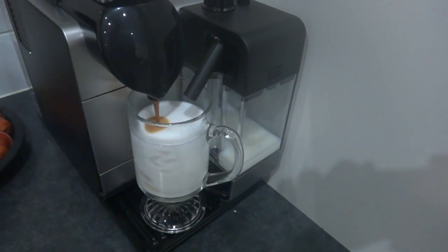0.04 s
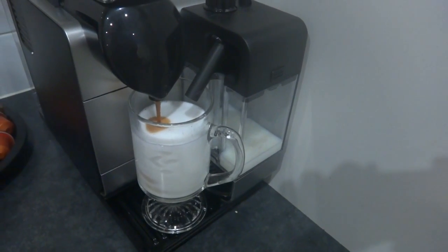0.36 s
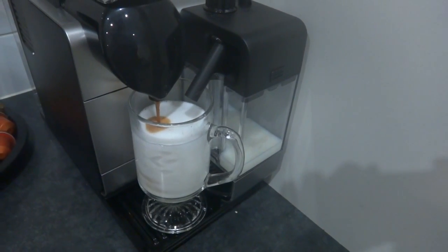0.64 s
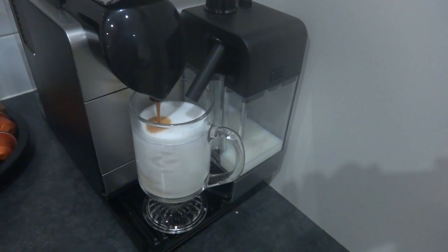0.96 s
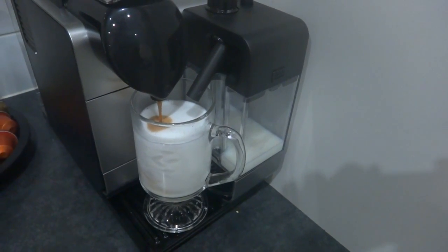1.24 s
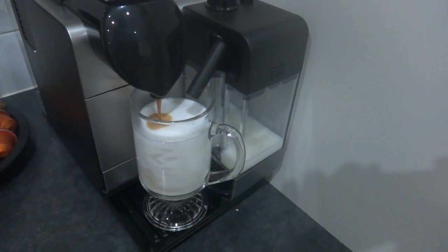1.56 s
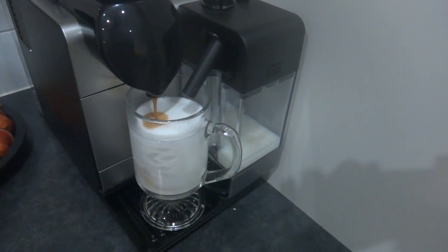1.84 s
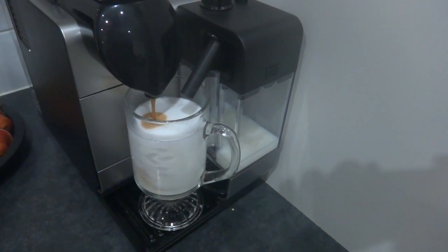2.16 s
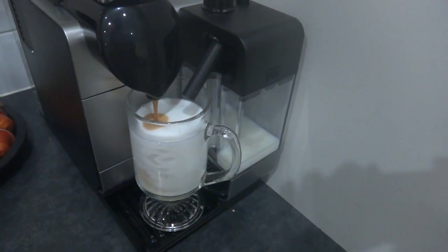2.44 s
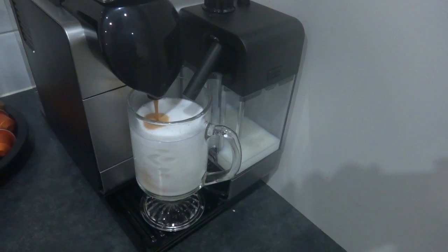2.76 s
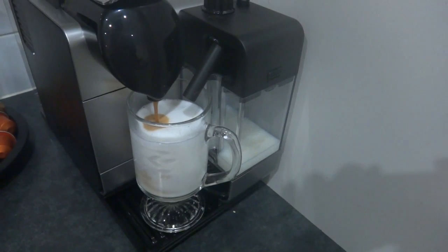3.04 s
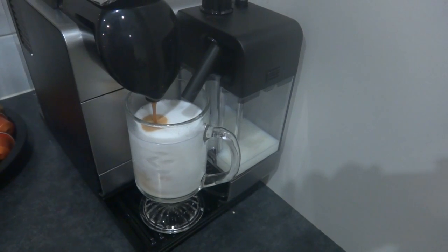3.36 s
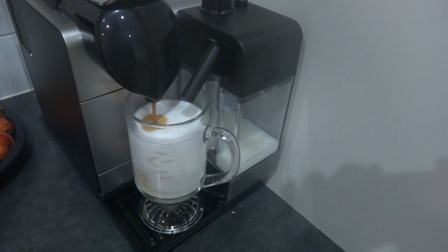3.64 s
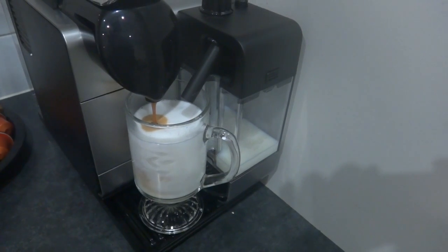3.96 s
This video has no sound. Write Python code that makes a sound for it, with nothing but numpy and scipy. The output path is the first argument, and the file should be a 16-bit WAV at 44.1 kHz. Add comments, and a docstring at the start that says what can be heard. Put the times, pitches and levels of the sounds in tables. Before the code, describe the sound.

A coffee machine pump buzzes close by in a kitchen. It opens with a loud, bright rattle and metallic ringing that die away by about 1 second. A quieter, steady drone with fine rapid ticking and occasional tiny clacks continues until 4 seconds. Water churns softly underneath. Around 2 seconds a panel briefly sings with the vibration, and a few faint gurgles pass between 2 and 2.5 seconds.

```python
"""Capsule coffee machine pouring

Close by in a kitchen, the machine pours into a mug of milk foam. Its vibrating pump strokes once per
mains cycle. At first the piston runs loose and rattles the housing; as water pressure builds, the
rattle dies and leaves a drone with the small knocks of piston and valves. Water churns underneath."""
import sys
import numpy as np
from scipy import signal
from scipy.fft import rfft, irfft
from scipy.io import wavfile
from scipy.ndimage import uniform_filter1d

SR = 44100
rng = np.random.default_rng(int(sys.argv[2]) if len(sys.argv) > 2 else 0)


def wrap_up_sound(samples):
    """Save the sound to the file named by the first command line argument, as 16-bit audio."""
    columns = np.atleast_2d(samples).T
    # keep every value between -1 and 1, then stretch to whole-number steps
    tamed = np.clip(columns, -1, 1)
    steps = np.round(tamed * 32767).astype(np.int16)
    wavfile.write(sys.argv[1], SR, steps)


N = 176400
STROKE_HZ = 50.05

# water pressure building up (time [s], share of full pressure [0-1])
PRESSURE_RISE = [(0, 0.02), (.25, 0.11), (.6, 0.28), (1.0, 0.45), (1.6, 0.59), (2.2, 0.76), (2.8, 0.91),
                 (3.4, 0.92), (4, 0.9)]
# sharp resonances of the housing (pitch [Hz], width [Hz])
HOUSING_MODES = [(2300, 140), (2531, 210), (3220, 29), (4230, 54), (5400, 28), (6020, 82), (11240, 290)]

# tone of the churning water (frequency [Hz], relative level [dB])
WATER_COLOUR = [(25, -42), (60, -40), (85, -11.5), (140, -23), (260, -8.5), (370, -9.5), (480, 2.5),
                (560, -4), (1200, 0.5), (1650, -3), (2000, -18), (2800, -7.5), (4000, -50)]
# envelope of the churning (time [s], relative level [dB])
WATER_ENVELOPE = [(0, -28.5), (.3, -35), (1.3, -38.5), (1.9, -39), (2.2, -40.5), (2.33, -38), (2.7, -43),
                  (4, -42.5)]
# short gurgles (time [s], half length [s], level [dB])
GURGLE_CUES = [(2.08, 0.048, -41), (2.324, .05, -36), (2.498, 0.015, -36), (2.53, .015, -33.5)]
# tone of the gurgling pipe (frequency [Hz], relative level [dB])
PIPE_COLOUR = [(1000, -10), (1450, -1), (1800, -10), (3200, -10), (6000, -45)]

# partials of a singing panel (multiple of the stroke rate, level [dB])
PANEL_PARTIALS = [(17, -39.5), (45, -42)]
# clean buzz near full pressure (multiple of the stroke rate, level [dB])
BUZZ_PARTIALS = [(19, -48), (21, -50), (23, -51), (27, -55), (29, -45), (30, -50), (33, -48), (34, -44.5),
                 (35, -42.5), (44, -48), (50, -46)]
# metal parts rung by the rattle
# (loudest at [s], half length [s], delay in the stroke [s], pitch [Hz], decay [s], level [dB])
METAL_MODES = [(0.069, .13, .0095, 2000, 0.008, -28.5), (.21, 0.13, .0095, 2160, 0.0064, -28),
               (0.69, 0.22, .0105, 1860, 0.0074, -34), (0.39, 0.52, .011, 3250, 0.0031, -39.5),
               (0.22, 0.55, 0.00894, 6050, 0.0035, -36.5)]
# valves and spring (delay in the stroke [s], pitch [Hz], decay [s], level [dB], timing jitter [s])
VALVE_MODES = [(.0078, 2282, 0.0022, -43.5, 0.000077), (.0112, 2530, 0.0026, -44, .00004),
               (.0135, 3230, 0.0036, -46.5, .00009), (.0105, 4230, 0.0026, -50.5, 0.000059),
               (.0105, 6000, 0.0038, -52, .00005), (.0005, 7200, .0022, -54.5, 0.000036),
               (.0005, 8220, 0.0039, -55, .00004), (0.0016, 8770, 0.0028, -55, .00004),
               (.0095, 11250, 0.0015, -57, 0.000046)]
# single sharp clacks of the piston (time [s], relative level [dB])
CLACK_CUES = [(.9874, -40), (1.008, -43), (1.1474, -43), (1.228, -47), (1.647, -42), (1.7466, -43),
              (2.504, -43), (2.528, -49), (3.408, -43), (3.8664, -40.5)]

# contacts within each stroke, under load and running loose (delay [s], centre [Hz], spread [octaves],
# relative level [dB], decay [s], swing up and down on alternate strokes [dB])
KNOCK_HITS = [(0, 8360, 0.25, 4, .0025, 3.5), (.002, 5570, 1, -3, 0.0066, 1),
              (.0038, 1360, 0.7, -1.5, 0.0035, 1.5), (.0096, 8000, 0.81, -3.5, 0.0058, -0.8),
              (.0135, 2630, 0.62, 1, 0.0036, 1), (.0163, 1390, 0.31, -1, 0.0064, 0)]
RATTLE_HITS = [(.0024, 1220, 1.43, -5, 0.0043, -3), (.0064, 9900, 0.96, 0, 0.0027, 1),
               (.0084, 7000, 1.83, -1, 0.0041, -0.5), (.0098, 2070, 0.77, 4.5, 0.0067, 0.2)]
# tone of the housing under knocks and under rattle (frequency [Hz], relative level [dB])
KNOCK_TONE = [(590, -36), (1000, -10), (1500, 0.5), (1840, -2), (2000, -11), (2400, -8), (2720, -9.5),
              (3050, -2.5), (3760, -14.5), (4600, -12), (6000, -15), (7500, -13), (9550, -19.5),
              (11300, -20.5), (13800, -28.5), (15700, -33)]
RATTLE_TONE = [(410, -41), (700, -2.5), (757, -9.5), (944, -3), (1020, -8.5), (1630, -14.5), (1830, -6.5),
               (2350, -9.5), (2740, -21), (3120, -10), (3840, -16.5), (6060, -15.5), (8170, -16.5),
               (10500, -16.5), (11300, -7.5), (12200, -18), (13200, -15.5), (13800, -42), (15700, -52)]
# envelopes of the knocks and the rattle (time [s], level [dB])
KNOCK_ENVELOPE = [(0, -28.5), (1, -33.5), (1.35, -35.5), (2.05, -36), (2.7, -36), (4, -35)]
RATTLE_ENVELOPE = [(0, -18), (.15, -21), (.32, -21.5), (.48, -24), (.65, -26.5), (.85, -30), (1.05, -41.5),
                   (1.4, -55), (4, -59)]
# top sizzle against the rest of the rattle (time [s], gain [dB])
SIZZLE_ENVELOPE = [(0, -1), (.3, 1.5), (.55, 1), (.75, -2), (1, -8)]

# pump drone at no, half and full pressure, stroke harmonics 1 to 20 (relative level [dB])
HARMONICS_FREE = [-41, -23.5, -12, -30, -7, -12, -7.5, -10.5, -7.5, -7.5, -31, -11.5, 0, -20, -6, -7, -3,
                  -3, -11.5, -4.5]
HARMONICS_HALF = [-47, -24.5, -22.5, -11, -6.5, -4.5, -4.5, -15.5, -3, -15, -43, -15.5, .5, 0.5, -27.5, -18,
                  -7, -12.5, -19, -15.5]
HARMONICS_FULL = [-40, -22.5, -16.5, -5.5, -7, 2.5, -6, -6, -1, -13.5, -47, -21, -1, -10, -8.5, -19, -20.5,
                  -41, -6.5, -20]
# envelope of the drone (time [s], relative level [dB])
DRONE_ENVELOPE = [(0.05, -21.5), (0.53, -23), (1.08, -27.5), (3.12, -30), (3.9, -30.5)]

TIME = np.arange(N) / SR
FREQS = np.arange(N // 2 + 1) * SR / N
STROKE_TIMES = np.arange(int(N / SR * STROKE_HZ) + 1) / STROKE_HZ


def undb(db):
    """Decibels to gain."""
    return 10 ** (np.asarray(db) / 20)


def unit(x):
    """Scale to rms 1."""
    return x / np.sqrt(np.mean(x ** 2))


def curve(rows):
    """Join (time [s], value) breakpoints with straight lines."""
    return np.interp(TIME, *np.array(rows).T)


def swell(at, half_length):
    """A rounded rise and fall around a moment."""
    return np.exp(-((TIME - at) / half_length) ** 2)


def wobble(rate_hz):
    """Smooth random modulation with a spread near 1."""
    hold = int(SR / rate_hz)
    steps = np.repeat(rng.standard_normal(N // hold + 1), hold)
    return 1.3 * uniform_filter1d(uniform_filter1d(steps, hold), hold)[:N]


def colour(x, points, smooth_bins=600):
    """Flatten the broad spectrum of x, then EQ it to the (frequency [Hz], level [dB]) points; rms 1."""
    hz, db = np.array(points).T
    spectrum = rfft(x)
    power = uniform_filter1d(abs(spectrum) ** 2, smooth_bins)
    gain = undb(np.interp(np.log(FREQS + 1), np.log(hz), db)) / np.sqrt(power + power.max() * 1e-7)
    low_cut = np.minimum(FREQS / hz[0], 1) ** 4 + 1e-4
    # minimum phase, so nothing rings ahead of a hit
    cepstrum = irfft(np.log(gain * low_cut))
    cepstrum[1:N // 2] *= 2
    cepstrum[N // 2 + 1:] = 0
    return unit(irfft(spectrum * np.exp(rfft(cepstrum))))


def struck(delay, hz, decay, jitter_s, rise_s=.00044, scatter_db=2.5):
    """One mode struck once a stroke, each blow a little different in time and strength; rms 1."""
    timing, strength = rng.standard_normal((len(STROKE_TIMES), 2)).T
    at = np.clip(STROKE_TIMES + delay + jitter_s * timing, 0, None) * SR
    hits = np.bincount(np.round(at).astype(int), undb(scatter_db * strength), 2 * N)[:N]
    t = TIME[:SR // 10]
    ring = (1 - np.exp(-t / rise_s)) * np.exp(-t / decay) * np.sin(2 * np.pi * hz * t)
    return unit(signal.fftconvolve(hits, ring)[:N])


def contacts(table, jitter_s, looseness, rise_s=.00048, scatter_db=1.68, swing_s=.00003):
    """Each contact hits once a stroke: a ring that is alike every time, plus ever-new bright chatter."""
    t = TIME[:SR // 20]
    alternate = np.cos(np.pi * np.arange(len(STROKE_TIMES)))  # +1, -1, +1, ...
    chatter_gain = looseness * FREQS / np.hypot(FREQS, 2200)  # high-pass
    out = 0
    for delay, hz, octaves, db, decay, swing_db in table:
        timing, strength = rng.standard_normal((len(STROKE_TIMES), 2)).T
        at = np.clip(STROKE_TIMES + delay + jitter_s * timing - swing_s * alternate, 0, None) * SR
        force = undb(scatter_db * strength + swing_db * alternate)
        whole, part = at.astype(int), at % 1  # each hit is shared between two samples
        hits = np.bincount(whole, force * (1 - part), 2 * N)[:N]
        hits += np.bincount(whole + 1, force * part, 2 * N)[:N]
        # a contact spreads through the housing before it is loudest
        envelope = (1 - np.exp(-t / rise_s)) * np.exp(-t / decay)
        ring = signal.fftconvolve(hits, envelope * rng.standard_normal(len(t)))[:N]
        chatter = signal.fftconvolve(hits, envelope)[:N] * rng.standard_normal(N)
        band = np.exp(-.5 * (np.log2((FREQS + 1) / hz) / octaves) ** 2)
        out += undb(db) * irfft(band * (rfft(ring) + chatter_gain * rfft(chatter)))
    return out


def housing(x, decay_s=.0053):
    """Plastic panels ring with a few strong resonances over many weak, short ones, mostly in the treble."""
    t = TIME[:SR // 20]
    strong = sum(1 / (1 + 2j * (FREQS - hz) / width) for hz, width in HOUSING_MODES)
    weak = rng.standard_normal(len(t)) * np.exp(-t / decay_s)
    rings = undb(18) * strong + undb(2) * rfft(weak / np.linalg.norm(weak), N)
    treble = FREQS ** 2 / (FREQS ** 2 + 6000 ** 2)
    return irfft(rfft(x) * (1 + treble * rings))


def kitchen(x, t60_s=.13, low_cut_hz=725, send_db=-11):
    """Short reflections from worktop and walls, different on each side and thin in the bass."""
    t = TIME[:SR // 3]
    tails = rng.standard_normal((2, len(t))) * np.exp(-np.log(1000) * t / t60_s)
    tails /= np.sqrt(np.sum(tails ** 2, axis=1, keepdims=True))
    tails = signal.sosfilt(signal.butter(1, low_cut_hz, "high", fs=SR, output="sos"), tails)
    return undb(send_db) * signal.fftconvolve(x[None], tails, axes=1)[:, :N]


def water(pulse_depth=.26, lag_s=.0072, trim_db=2):
    """Water churns in the pump and pipes, pushed by every stroke and swelling now and then."""
    push = 1 + pulse_depth * np.cos(2 * np.pi * STROKE_HZ * (TIME - lag_s))
    return colour(push * rng.standard_normal(N), WATER_COLOUR) * undb(curve(WATER_ENVELOPE) + trim_db)


def gurgles():
    """Pockets of air pass through the pipe in short, hollow swells of noise."""
    envelope = sum(undb(db) * swell(at, half) for at, half, db in GURGLE_CUES)
    return envelope * colour(rng.standard_normal(N), PIPE_COLOUR)


def panel(at_s=2, half_length_s=.22):
    """A loose panel swells into resonance and falls silent again."""
    envelope = np.exp(-((TIME - at_s) / half_length_s) ** 4)
    phase = 2 * np.pi * STROKE_HZ * TIME
    return envelope * sum(undb(db) * np.cos(k * (phase + .038 * wobble(24.94)))
                          for k, db in PANEL_PARTIALS)


def buzz(pressure, lag_s=.0172, waver_db=2.5, smear_rad=.63):
    """The loaded piston seats evenly, so a clean buzz grows with the pressure."""
    phase = 2 * np.pi * STROKE_HZ * (TIME - lag_s)
    out = 0
    for k, db in BUZZ_PARTIALS:
        gain = undb(db + waver_db * wobble(5.97))
        out += gain * np.cos(k * phase + smear_rad * rng.standard_normal())
    return pressure ** 2 * out


def metal():
    """As the piston's travel shortens, one metal part after another rings with its blows."""
    return sum(undb(db) * swell(at, half) * struck(delay, hz, decay, jitter_s=.00006)
               for at, half, delay, hz, decay, db in METAL_MODES)


def valves(spurt_db=2.2):
    """Valves and spring tick in short spurts, each at its own pitch and point of the stroke."""
    return sum(undb(db) * unit(undb(spurt_db * wobble(14)) * struck(delay, hz, decay, jitter))
               for delay, hz, decay, db, jitter in VALVE_MODES)


def clacks(rise_s=.0012, decay_s=.005, trim_db=13.5):
    """Now and then the piston touches its stop again: a tiny noise burst in the rattle's tone."""
    envelope = sum(undb(db) * np.clip((TIME - at) / rise_s, 0, 1) * np.exp(-abs(TIME - at) / decay_s)
                   for at, db in CLACK_CUES)
    return undb(trim_db) * envelope * colour(rng.standard_normal(N), RATTLE_TONE)


def knocks(waver_db=.3):
    """Under load, piston and valves knock softly, wavering with the flow."""
    hits = contacts(KNOCK_HITS, jitter_s=.00002, looseness=.57)
    blows = colour(housing(hits), KNOCK_TONE, smooth_bins=1000)
    return blows * undb(curve(KNOCK_ENVELOPE) + waver_db * wobble(29))


def rattle(sizzle_hz=9700, flutter_db=2.2):
    """The unloaded piston slams into its stop: a bright burst a stroke; the top flutters and fades first."""
    hits = contacts(RATTLE_HITS, jitter_s=.00007, looseness=1.5)
    blows = colour(housing(hits), RATTLE_TONE, smooth_bins=1000)
    sizzle = signal.sosfiltfilt(signal.butter(4, sizzle_hz, "high", fs=SR, output="sos"), blows)
    body = blows - sizzle
    sizzle_gain = undb(curve(SIZZLE_ENVELOPE) + flutter_db * wobble(50.9))
    return (body + sizzle * sizzle_gain) * undb(curve(RATTLE_ENVELOPE))


def drone(pressure, waver_db_per_harmonic=.082, smear_rad=.96, trim_db=-.94):
    """The piston shakes the body at multiples of the stroke rate; pressure shifts their balance."""
    crossfade = np.clip([1 - 2 * pressure, 1 - abs(2 * pressure - 1), 2 * pressure - 1], 0, 1)
    out = 0
    for k, levels in enumerate(zip(HARMONICS_FREE, HARMONICS_HALF, HARMONICS_FULL), 1):
        hz = k * STROKE_HZ
        db = np.array(levels) @ crossfade + waver_db_per_harmonic * k * wobble(7.56)
        lag_s = .002974 + 5e-6 * hz  # higher partials come out later
        out += undb(db) * np.cos(2 * np.pi * hz * (TIME - lag_s) + smear_rad * rng.standard_normal())
    levelled = out / np.sqrt(uniform_filter1d(out ** 2, size=SR // 5))
    return levelled * undb(curve(DRONE_ENVELOPE) + trim_db)


def scene(left_bias_db=.67):
    """The machine, a little left of centre, in its room."""
    pressure = curve(PRESSURE_RISE)
    machine = drone(pressure) + rattle() + knocks() + clacks() + panel() + water()
    machine += valves() + metal() + buzz(pressure) + gurgles()
    pan = undb([[left_bias_db / 2], [-left_bias_db / 2]])
    return (machine + kitchen(machine)) * pan


def record(dry, top_hz=15800):
    """A steep low-pass takes off the very top."""
    return signal.sosfilt(signal.ellip(8, .2, 70, top_hz, fs=SR, output="sos"), dry)


dry = scene()
out = record(dry)
wrap_up_sound(out)
```